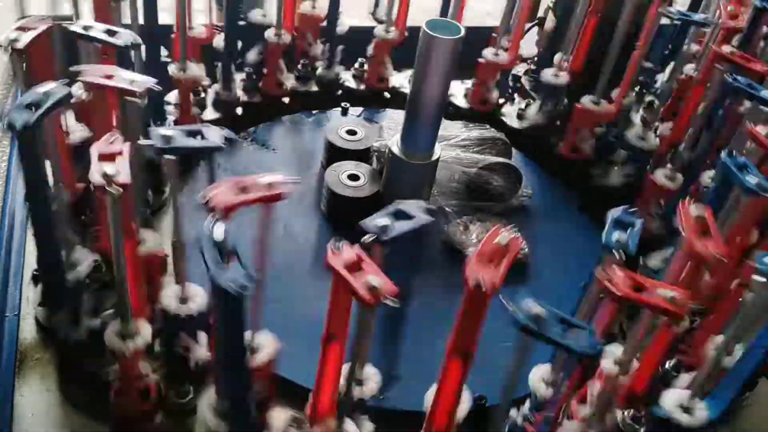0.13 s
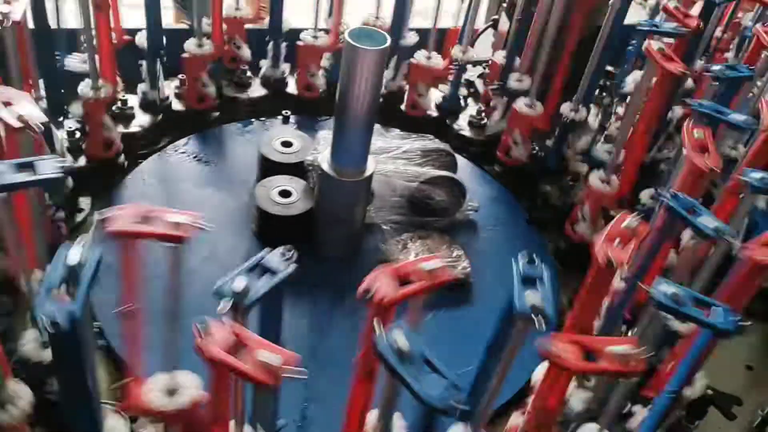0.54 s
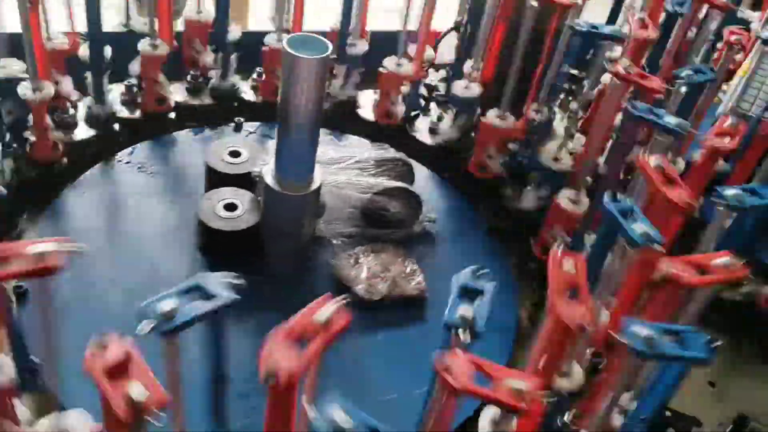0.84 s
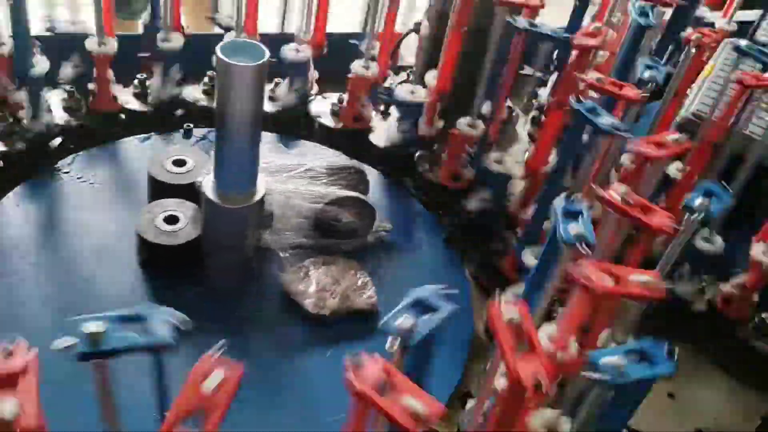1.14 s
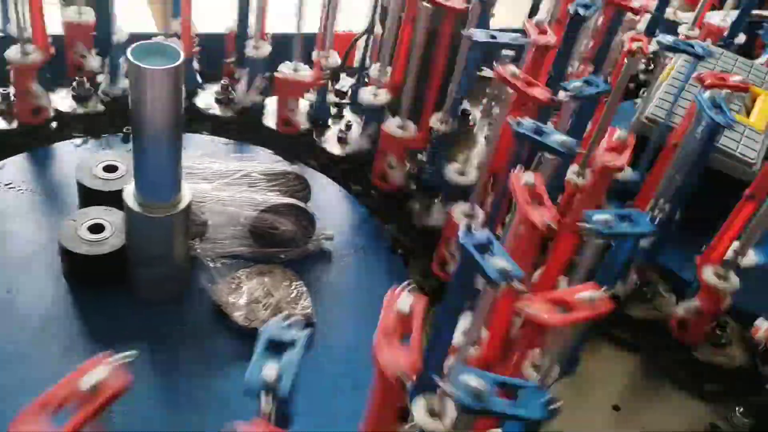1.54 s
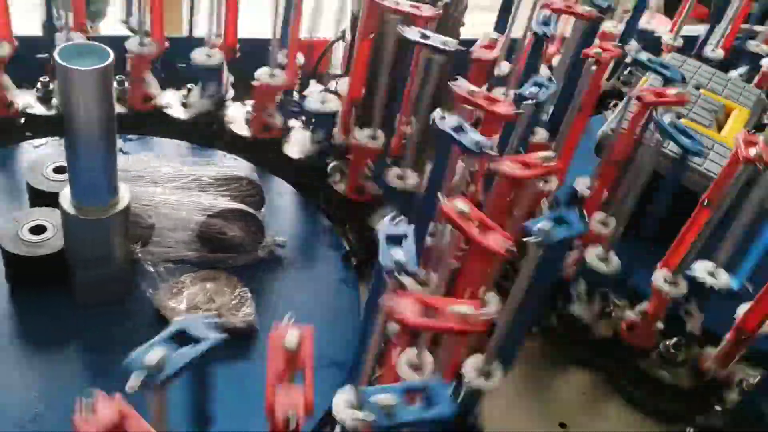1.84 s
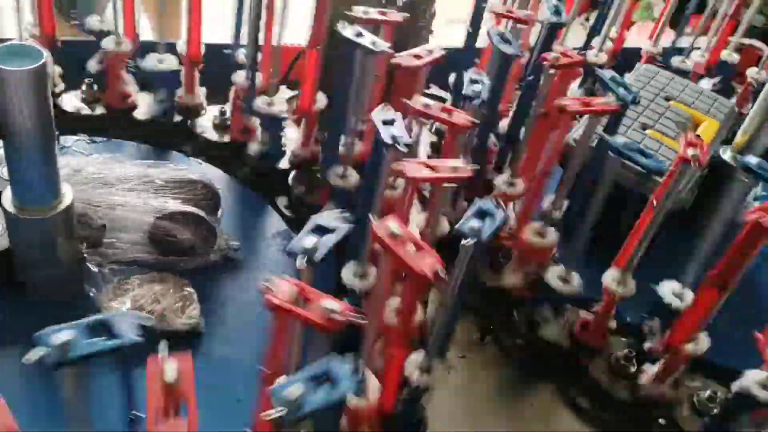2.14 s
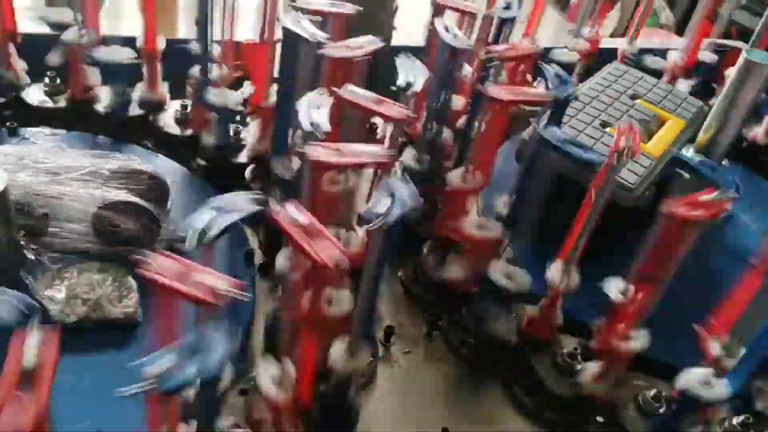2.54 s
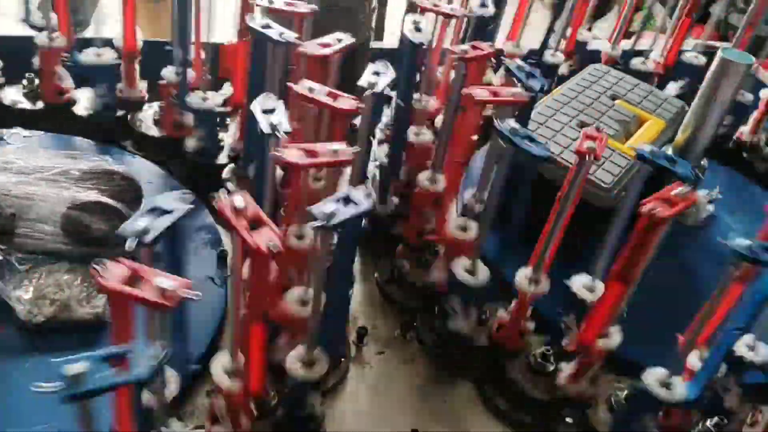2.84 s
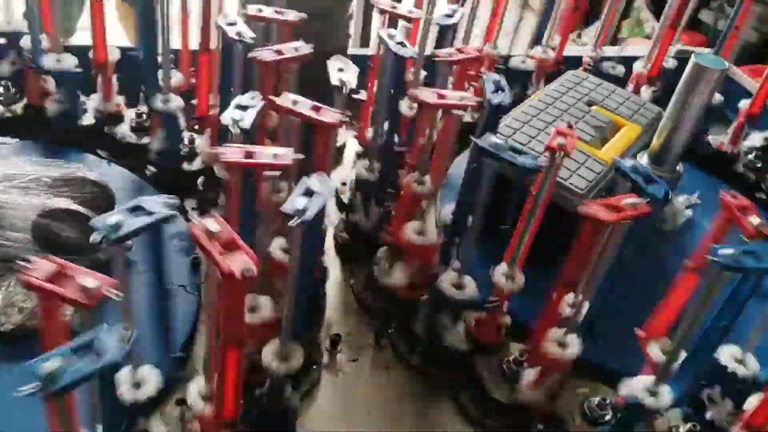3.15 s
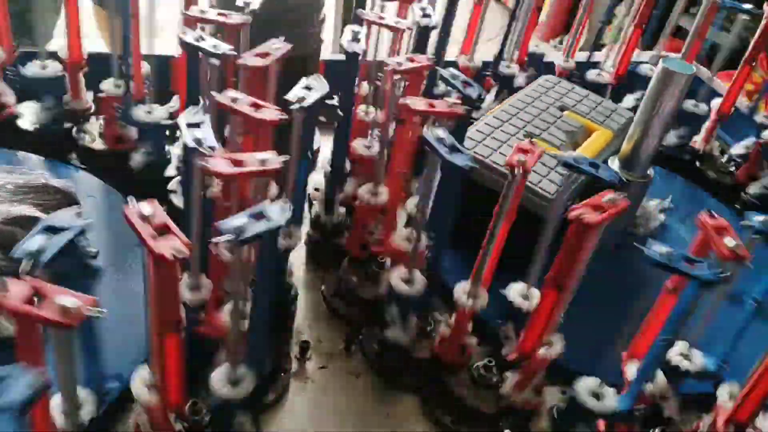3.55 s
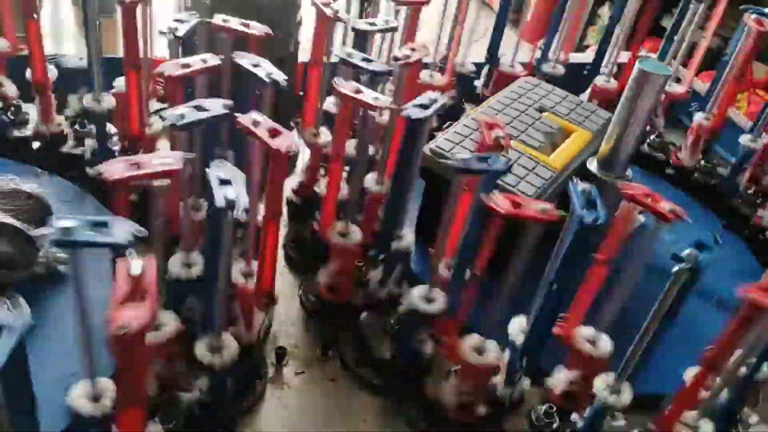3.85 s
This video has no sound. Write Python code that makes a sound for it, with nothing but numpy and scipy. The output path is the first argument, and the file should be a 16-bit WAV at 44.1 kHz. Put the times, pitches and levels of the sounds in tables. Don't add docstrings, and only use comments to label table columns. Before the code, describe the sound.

A braiding machine clatters rapidly and continuously in a workshop, with metal ticks, brief squeaks, gear whine and low drive hum; a close stereo phone fades in, then the noise drops slightly after about a second.

```python
import sys
import numpy as np
from scipy import signal
from scipy.fft import rfft, irfft, next_fast_len
from scipy.io import wavfile
from scipy.ndimage import uniform_filter1d, map_coordinates

SR = 44100
rng = np.random.default_rng(int(sys.argv[2]) if len(sys.argv) > 2 else 0)


def store_wav(level_fs):
    pcm = np.round(np.clip(np.atleast_2d(level_fs), -1, 1) * 32767)
    wavfile.write(sys.argv[1], SR, pcm.T.astype(np.int16))


def how_loud(loudness_db):
    steps = np.asarray(loudness_db, float) / 20
    return 10 ** steps


N = 176400
TIME_S = np.arange(N) / SR
HANDOVER_HZ = 14.2


def unit(x):
    return x / np.sqrt(np.mean(x ** 2) + 1e-20)


def along(points, hz):
    f, v = np.transpose(points)
    return np.interp(np.log(hz + 1), np.log(f + 1), v)


def wobble(rate):
    return map_coordinates(rng.standard_normal(800), [np.arange(N) * rate / SR])


def filtered(x, response):
    size = next_fast_len(N + 8192)
    spectrum = rfft(x, size) * response(np.fft.rfftfreq(size, 1 / SR))
    return irfft(spectrum, size)[..., :N]


def narrow(hz, width_hz):
    noise = rng.standard_normal((2, N))
    return unit(filtered(noise, lambda f: 1 / (1 + ((f - hz) / width_hz * 2) ** 2)))


def ticks():
    per_s, middle_hz, spread_octaves, ring_cycles = 1100, 4211, 1.1, 48
    scatter_db, level_db, beat_lock = 2, -30.5, 0.3
    count, t = per_s * N // SR, np.arange(1000) / SR
    beat = 2 * np.pi * HANDOVER_HZ
    ports = []
    for _ in range(2):
        start_s = rng.random(count) * N / SR
        start_s = start_s + beat_lock * np.sin(beat * start_s) / beat
        octaves = spread_octaves * rng.standard_normal(count)
        hz = np.clip(middle_hz * 2 ** octaves, 500, 15000)[:, None]
        size = how_loud(scatter_db * np.minimum(-np.log(1 - rng.random(count)), 4))[:, None]
        ring = size * np.sin(2 * np.pi * hz * t) * np.exp(-np.pi * hz * t / ring_cycles)
        ring = ring * np.minimum(1, (t[-1] - t) * 200)
        at = np.clip(start_s * SR, 0, N).astype(int)[:, None] + np.arange(len(t))
        ports.append(np.bincount(at.ravel(), ring.ravel(), N + len(t) + 1)[:N])
    return how_loud(level_db) * unit(np.array(ports))


# time in
# seconds, pitch in Hz, level in dB.
SQUEAKS_LEFT = [(0.5, 4610.0, -36), (0.57, 4690.0, -35), (1.2, 1890.0, -27), (1.2, 8480.0, -34),
                (1.23, 5430.0, -27.5), (1.28, 6800.0, -20.5), (1.33, 1940.0, -25.5), (1.35, 5430.0, -28),
                (1.36, 8910.0, -30), (1.45, 5470.0, -36), (1.52, 7540.0, -25), (1.52, 5470.0, -30),
                (1.57, 1940.0, -26), (1.62, 5340.0, -32), (1.69, 1980.0, -30), (1.77, 8350.0, -36),
                (1.78, 4690.0, -40), (1.96, 7580.0, -23), (1.96, 8350.0, -35), (2.11, 1940.0, -25.5),
                (2.2, 8310.0, -33), (2.23, 5340.0, -33), (2.26, 2760.0, -32), (2.3, 5430.0, -28),
                (2.65, 2580.0, -30), (2.67, 1720.0, -27), (3.35, 860.0, -26.5), (3.5, 5430.0, -36),
                (3.8, 3190.0, -34), (3.8, 8530.0, -45), (3.81, 5860.0, -32), (3.88, 860.0, -26)]
# time in seconds, pitch in Hz, level in dB.
SQUEAKS_RIGHT = [(1.2, 2190, -31), (1.29, 6760.0, -29), (1.31, 8640, -31), (1.33, 7880.0, -30),
                 (1.34, 3480, -27.5), (1.35, 2320, -27.5), (1.44, 5510.0, -27), (1.54, 4240, -25.5),
                 (1.54, 6070.0, -28), (1.57, 8010.0, -29), (1.59, 3750.0, -27), (1.71, 3100, -26),
                 (1.78, 8510, -31), (1.83, 1870, -27), (1.86, 4840, -26), (2.11, 3810, -28),
                 (2.21, 2670.0, -26.5), (2.21, 5120.0, -27), (2.29, 2280.0, -20.5), (2.59, 2637, -31),
                 (2.9, 3605, -28), (3.25, 5040.0, -28), (3.331, 7140, -28), (3.47, 5130, -27.5),
                 (3.6, 1530, -29), (3.62, 5940.0, -30), (3.721, 8740.0, -32), (3.8, 6400, -39),
                 (3.8, 5830, -27)]
# time in seconds, pitch in Hz, level in dB.
SQUEAKS_BOTH = [(2.6, 2620, -30.5), (2.68, 2560, -30), (2.98, 2460, -29), (3.03, 2520, -34),
                (3.05, 4480, -32), (3.6, 4320, -33), (3.45, 850, -31.5), (0.42, 900, -31),
                (0.501, 700, -31), (0.616, 760, -31), (0.735, 940, -31.5), (3.2, 560, -34),
                (2.25, 2800, -32.5), (3.97, 2750, -30), (3.9, 4300, -33)]


def squeaks():
    length_s, rough_width_hz, clean_share, level_db = 0.041, 220, 0.95, 2.5
    ports = []
    for rows in (SQUEAKS_LEFT + SQUEAKS_BOTH, SQUEAKS_RIGHT + SQUEAKS_BOTH):
        port = np.zeros(N)
        for s, hz, db in rows:
            swell = np.exp(-((TIME_S - s) / length_s) ** 2)
            port += how_loud(db) * swell * np.sin(2 * np.pi * hz * TIME_S)
        ports.append(port)
    return how_loud(level_db) * np.array(ports) * (clean_share + narrow(0, rough_width_hz))


# pitch in Hz, width in Hz, left level in dB, right level in dB.
PLATE_RINGS = [(1984, 130, -13, -27), (2180, 200, -14, -11.5)]
# pitch in Hz, width in Hz, left level in dB, right level in dB.
SPINDLE_RINGS = [(6830, 91, -38, -58), (7570, 500, -27.5, -51), (5430, 140, -40, -54),
                 (4180, 360, -73, -36)]
# time in seconds, whine strength in dB, pitch in Hz.
MESH = [(0.3, -29, 2360), (0.43, -29.5, 2445), (1.37, -23, 2323), (1.988, -29.5, 2442), (2.12, -23.5, 2360),
        (2.159, -28, 2570), (2.19, -26, 2600), (2.309, -21, 2297), (2.399, -33, 2384), (2.63, -23.5, 2543),
        (2.83, -29.5, 2408), (3.01, -23, 2490), (3.04, -31, 2442), (3.491, -27, 2375), (3.6, -29, 2510),
        (3.89, -30, 2460), (3.97, -23, 2580), (4.0, -42, 2650)]
MESH_DB = [
    [-32],
    [-2.5],
]


def rings(rows, swing_db):
    total = np.zeros((2, N))
    for hz, width_hz, left_db, right_db in rows:
        total += narrow(hz, width_hz) * how_loud(np.array([[left_db], [right_db]]) + swing_db * wobble(9))
    return total


def whine():
    mesh_width_hz, beats_per_handover, beat_depth = 280, 5, 0.6
    s, db, hz = np.transpose(MESH)
    beat = 1 + beat_depth * np.sin(2 * np.pi * beats_per_handover * HANDOVER_HZ * TIME_S)
    strength = beat * how_loud(np.interp(TIME_S, s, db))
    phase = 2 * np.pi * np.cumsum(np.interp(TIME_S, s, hz)) / SR
    drifting = narrow(0, mesh_width_hz) * np.cos(phase) + narrow(0, mesh_width_hz) * np.sin(phase)
    plates = strength * (how_loud(MESH_DB) * drifting + rings(PLATE_RINGS, swing_db=2))
    return plates + rings(SPINDLE_RINGS, swing_db=2.5)


# frequency in Hz, left-right likeness from -1 to 1.
ALIKE = [(60, 0.94), (180, 0.93), (550, 0.72), (1650, -0.16), (4970, 0.17), (15000, -0.31)]


def spread(pair):
    def turn(hz):
        return np.arccos(np.clip(along(ALIKE, hz), -1, 1)) / 2

    mid, side = filtered(pair, lambda hz: np.array([np.cos(turn(hz)), np.sin(turn(hz))]))
    return np.array([mid + side, mid - side])


# multiple of the hand-over rate, level in dB.
DRIVE_ORDERS = [(4.2, -18.5), (6.0, -7), (9.0, -7), (13, -14), (18.1, -14.5)]
# time in seconds, hum level in dB.
NEAR_DRIVE = [(0.25, -57.5), (0.43, -41.5), (1.01, -40), (1.3, -30.5), (1.45, -37), (1.66, -26),
              (1.75, -33), (1.87, -30), (1.93, -38), (1.98, -33), (2.11, -36.5), (2.25, -34), (2.5, -38),
              (2.65, -41), (3.1, -38), (3.5, -41.5), (4.0, -41.5)]


def hum():
    order_width_hz, rumble_hz, rumble_width_hz, rumble_db = 16, 146, 94, -3
    total = how_loud(rumble_db) * narrow(rumble_hz, rumble_width_hz)
    for multiple, db in DRIVE_ORDERS:
        hz = multiple * HANDOVER_HZ
        tone = np.sin(2 * np.pi * hz * TIME_S + wobble(2.91))
        total += how_loud(db) * (narrow(hz, order_width_hz) + [[1], [0]] * tone)
    s, db = np.transpose(NEAR_DRIVE)
    return unit(spread(total)) * how_loud(np.interp(TIME_S, s, db))


# time in seconds, level in dB.
THUMPS = [
    (1.3, -27.5),
    (3.0, -28),
]


def thumps():
    boom_hz, boom_width_hz, length_s = 262, 33, 0.034
    swells = sum(how_loud(db) * np.exp(-((TIME_S - s) / length_s) ** 2) for s, db in THUMPS)
    return swells * narrow(boom_hz, boom_width_hz)[0]


# frequency in Hz, level in dB.
DIN_TONE = [(30, -49), (60, -12), (150, -7), (300, -5), (520, -5), (850, 1), (1300, -6.5), (2300, -5)]


def din():
    level_db, patchy_db, beat_db, swell_db = -18, 0.5, 0.5, 0.25
    z = signal.stft(rng.standard_normal((2, N)), nperseg=512)[2]
    patches = uniform_filter1d(rng.standard_normal(z.shape[1:]), size=5, axis=0)
    patches = unit(uniform_filter1d(patches, size=10, axis=1))
    pair = signal.istft(z * how_loud(patchy_db * patches), nperseg=512)[1][:, :N]
    throb_db = beat_db * np.sin(2 * np.pi * HANDOVER_HZ * TIME_S) + swell_db * (wobble(5) + wobble(11))
    return how_loud(level_db + throb_db) * unit(filtered(pair, lambda hz: how_loud(along(DIN_TONE, hz))))


# frequency in Hz, gain in dB.
LEFT_PORT = [(1000, 4), (2900, 4), (4100, -8), (5600, 3.5), (7200, 10.5), (8300, 3.5), (9900, -14),
             (14000, -6.5)]
# frequency in Hz, gain in dB.
RIGHT_PORT = [(1000, 0), (2250, 7.5), (3200, 4), (4300, 7.5), (5800, 4.5), (8500, 5.5), (10600, -8.5),
              (15000, -22.5)]


def scene():
    clatter = spread(ticks() + din())
    clatter = filtered(clatter, lambda hz: how_loud([along(LEFT_PORT, hz), along(RIGHT_PORT, hz)]))
    return clatter + squeaks() + whine() + (hum() + thumps()) * how_loud([[1.9], [-1.9]])


# frequency in Hz, gain in dB.
DUCK = [(100, -1.5), (400, -4.5), (900, -5.5), (1500, -4), (2400, -3), (5000, -3.5), (8000, -2.5),
        (14000, -2.5)]
AT_ONCE = [
    [[0.23]],
    [[0.36]],
]


def suppress(x):
    learn_s, settle_s, creep_s = 1.123, 0.04, 0.18
    oversubtract, quick_hz = 0.32, 1700
    hz, t, z = signal.stft(x, SR, nperseg=512)
    power = uniform_filter1d(np.abs(z) ** 2, size=5, axis=2)
    learnt = power.mean(2, keepdims=True)
    left_over = np.clip(1 - oversubtract * learnt / (power + 1e-20), 0.05, 1)
    keep = np.sqrt(left_over / (1 - oversubtract))
    since = np.maximum(t - learn_s, 0)
    slow_band = 1 / (1 + (quick_hz / (hz[:, None] + 1)) ** 6)
    creeping = (1 - np.clip(AT_ONCE, 0, 1)) * slow_band * np.exp(-since / creep_s)
    engaged = np.minimum(since / settle_s, 1) * (1 - creeping)
    duck_db = along(DUCK, hz)[:, None] + np.array([-2, 0])[:, None, None]
    return signal.istft(z * (keep * how_loud(duck_db)) ** engaged, SR, nperseg=512)[1][:, :N]


# frequency in Hz, level in dB over the mean line.
THRIFT_LEFT = [(2500, -7), (4200, 3), (5500, -4), (7800, -12), (9500, 7), (11500, 0), (14000, -2),
               (15600, 2.5)]
# frequency in Hz, level in dB over the mean line.
THRIFT_RIGHT = [(2500, -12), (4200, -7.5), (5800, -2.5), (8500, -10.5), (10400, 4), (12000, 5.5),
                (14000, 3.5), (15600, 4)]


def starve(x):
    swing_db, shared_luck, full_below_hz = 2, 0.73, 2400
    edge_hz, edge_swing_hz = 15450, 330
    hz, t, z = signal.stft(x, SR, window="cosine", nperseg=2048)
    own = rng.standard_normal((2, 43, len(t)))
    shared = rng.standard_normal((43, len(t)))
    luck = unit(uniform_filter1d(own + shared_luck * shared, size=3, axis=2))
    luck = np.repeat(luck, 24, axis=1)[:, :len(hz)]
    power = np.abs(z) ** 2

    def usual(p):
        return np.abs(uniform_filter1d(uniform_filter1d(p, size=24, axis=1), size=12, axis=2)) + 1e-20

    limit_db = np.array([along(THRIFT_LEFT, hz), along(THRIFT_RIGHT, hz)])[:, :, None]
    limit_db = limit_db + swing_db * luck * np.clip(hz / 9000, 0, 1)[:, None]
    strong = uniform_filter1d(power, size=2, axis=1) > usual(power) * how_loud(2 * limit_db)
    kept = strong | (hz < full_below_hz)[:, None]
    top_edge_hz = edge_hz + edge_swing_hz * unit(shared[0] + np.roll(shared[0], 1))
    kept = kept & (hz[:, None] < top_edge_hz)
    makeup = np.sqrt(np.clip(usual(power) / usual(power * kept), 1, 8))
    return signal.istft(z * kept * makeup, SR, window="cosine", nperseg=2048)[1][:, :N]


def top_cut(x):
    return signal.sosfilt(signal.butter(12, 16200, fs=SR, output="sos"), x)


def record(dry):
    start_s, fade_s, fade_from, bass_late_s, bass_hz, top_hz = 0.21, 0.25, 0.11, 0.2, 187, 15750
    t = TIME_S - start_s
    fade = (t > 0) * np.clip(fade_from + t / fade_s, 0, 1)
    x = suppress(dry)
    bass = filtered(x, lambda hz: 1 / (1 + (hz / bass_hz) ** 4))
    x = x - bass * np.clip(1 - (t / bass_late_s) ** 2, 0, 1)
    mix = filtered(starve(x), lambda hz: hz < top_hz) * fade
    return top_cut(mix)


dry = scene()
out = record(dry)
store_wav(out)
```